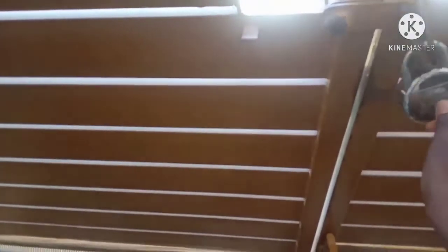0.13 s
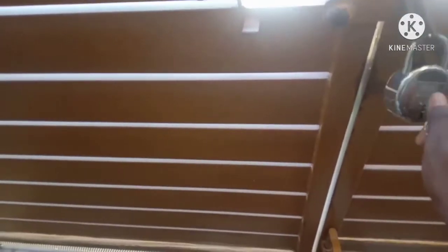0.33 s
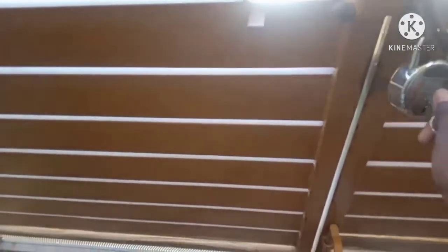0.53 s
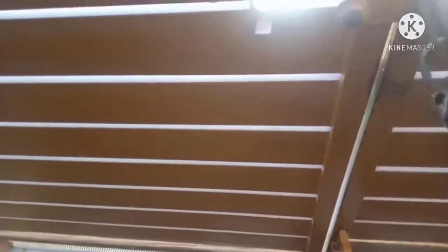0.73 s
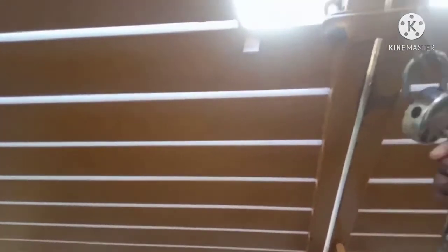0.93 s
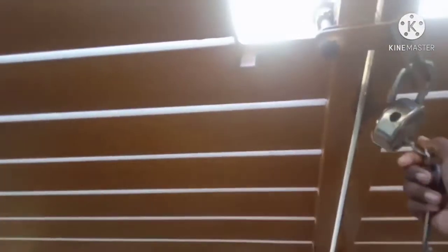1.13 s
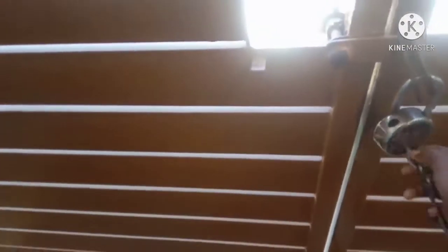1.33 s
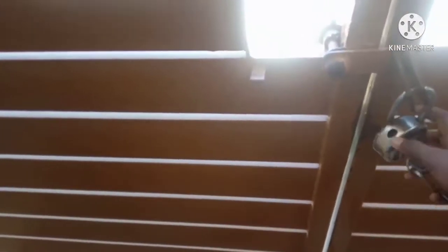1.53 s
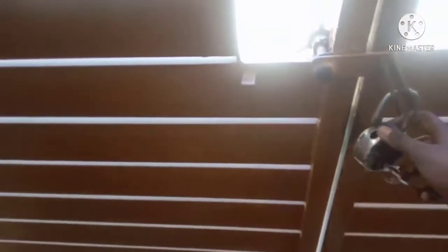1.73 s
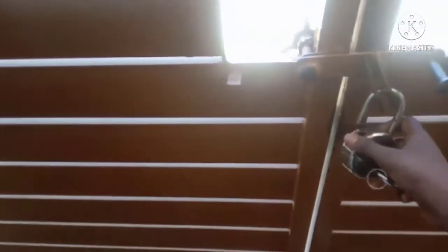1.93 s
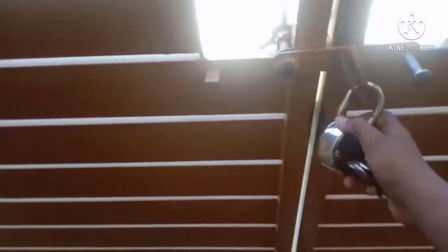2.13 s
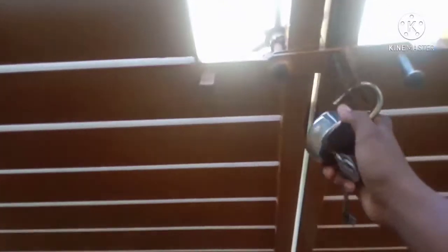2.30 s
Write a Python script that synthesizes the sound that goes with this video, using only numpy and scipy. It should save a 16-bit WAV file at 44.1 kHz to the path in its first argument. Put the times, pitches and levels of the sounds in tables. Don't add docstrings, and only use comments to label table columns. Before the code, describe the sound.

Close phone pickup of a padlock being handled: a bright clink and thud, a loud burst of metallic clatter and dragging, a sharp knock, light ticks, then a last ringing clank while the wooden door hums.

```python
import sys
import numpy as np
from scipy import signal
from scipy.fft import rfft, irfft
from scipy.io import wavfile
from scipy.ndimage import uniform_filter1d, minimum_filter1d

SR = 44100
rng = np.random.default_rng(int(sys.argv[2]) if len(sys.argv) > 2 else 0)


def magnitude_from_level(level_db):
    exponent = np.asarray(level_db, float) / 20
    return 10 ** exponent


def unload_audio(sound):
    columns = np.transpose(np.atleast_2d(sound))
    steps = np.round(np.clip(columns, -1, 1) * 32767)
    wavfile.write(sys.argv[1], SR, steps.astype(np.int16))


N = 104296

# f/Hz, level/dB
AIR_COLOUR = [(30, -19.5), (250, -21), (600, -0.5), (1300, -18.5), (3200, -49), (5500, -7.5), (10500, -14),
              (12500, -33)]
# t/s, level/dB
GRIP_PRESSURE = [(0.0, -45.5), (0.08, -64), (0.51, -54.5), (0.59, -73), (0.74, -41), (0.87, -48),
                 (0.89, -61), (1.07, -51), (1.14, -61), (1.29, -47), (1.32, -55.5), (1.75, -56.5),
                 (1.81, -42.5), (1.85, -68), (1.96, -50), (2.21, -61), (2.27, -60), (2.36, -62)]
# f/Hz, time to fall 60 dB/s
ROOM_DECAY = [(150, 0.82), (500, 0.91), (2000, 0.59), (5000, 0.44), (9000, 0.43), (15000, 0.2)]
# t/s, f/Hz, level/dB, time to fall 60 dB/s
LATE_HUMS = [
    (1.4, 430, -36, .7),
    (1.5, 350, -41, .5),
    (1.85, 605, -36, .7),
    (1.98, 604, -37, .6),
    (2.2, 600, -29, .4),
    (2.25, 520, -29, .8),
    (2.25, 351, -32, .8),
]
# t/s, f/Hz, level/dB, time to fall 60 dB/s
DOOR_HUM = [(0, 520, -24, .4), (.02, 318, -23, .6), (.1, 528, -27, .35), (.36, 358, -25, .45),
            (.365, 655, -29, .25), (.395, 615, -30, .3), (.44, 495, -29, .25), (.47, 358, -23, .25),
            (.59, 356, -29, .5), (.8, 270, -26, .3), (.85, 316, -27, .4), (2.15, 520, -31, .5),
            (2.15, 350, -31, .5), (2.17, 640, -31, .3)]
# f/Hz, width/Hz, level/dB
PANEL_MODES = [(194, 110, -21.5), (334.5, 39, -2.5), (353.5, 15, -0.5), (446, 53, -4.5), (499.3, 13.3, 2),
               (531.6, 55, 1.5), (597, 82, 0), (684, 84, 0.5), (757.5, 25.3, -3), (828, 76, -3.5),
               (1038, 258, 0), (1484, 750, 0.5), (1735, 210, 1), (2400, 890, -8)]
# t/s, level/dB, how far the whole leaf joins in/dB
DOOR_SHAKE = [(0, -32, -1), (.05, -32.5, -6.5), (.3, -49.5, 11), (.36, -29, -2.5), (.5, -34, -4.5),
              (.55, -38.5, -21), (.62, -43.5, 1), (.67, -32.5, 1), (.75, -15, -3.5), (.85, -26, -1.5),
              (1.0, -35.5, 3), (1.28, -49.5, -11.5), (1.39, -35, -18), (1.75, -52, -9.5),
              (1.9, -34.5, -16.5), (2.13, -67, 7.5), (2.15, -28.5, -2.5), (2.36, -37, 4)]
# t/s, level/dB
DOOR_THUDS = [
    (0, -24),
    (.3565, -18),
    (1.311, -20.5),
    (2.14, -25.5),
]
# f/Hz, level/dB, time to fall 60 dB/s
LOCK_PARTS = [(4680, -24, .15), (7060, -26, .1), (7465, -20, .2), (7555, -10, .25), (7750, -22, .1),
              (9770, -24, .12), (10950, -22, .2), (12450, -19, .12), (12690, -17, .3), (14300, -23, .1),
              (15250, -14, .15)]
# f/Hz, level/dB
TICK_COLOUR = [(2000, -14), (5000, -1.5), (7000, 4.5), (10500, 10.5), (13000, -11), (15500, 6)]
# t/s, tick level/dB, ring level/dB, centre of the ringing parts f/Hz, time until damped/s
LOCK_CLINKS = [(0.0537, -2.5, -14, 9200, 0.066), (0.3575, -23.5, -33, 17500, .07),
               (0.6737, -2.5, -14, 8000, .15), (1.129, -13.5, -33, 4700, .05),
               (1.429, -37, -41, 12500, .03), (1.441, -50, -35, 15000, .04), (1.452, -42, -30, 12700, .03),
               (1.458, -40, -29, 7600, 0.01), (1.49, -55, -37, 15200, .07), (1.519, -49, -28, 8800, 0.025),
               (1.552, -36, -34, 9000, .015), (1.572, -55, -42, 15000, .04),
               (1.636, -12, -33, 14800, 0.049), (1.641, -14, -22, 13500, 0.085),
               (1.726, -29, -26, 7940, .02), (1.735, -50, -33, 14900, .045), (1.762, -29, -36, 11800, .025),
               (1.89, -30, -24, 7600, .006), (2.18, -55, -42, 13500, 0.039), (2.31, -55, -54, 12500, 0.033),
               (2.354, -26, -19.5, 9300, .05)]
# t/s, f/Hz, level/dB, time to fall 60 dB/s
HASP_TONES = [(0, 1710, -38, .5), (1.33, 1740, -32, .5), (1.832, 4720, -29, .12), (1.832, 3970, -30, .1),
              (1.845, 3400, -33, .12), (1.881, 3970, -24, .15), (1.885, 5490, -27, .1),
              (2.139, 5600, -23, .25), (2.14, 3190, -26, .45), (2.14, 2820, -28, .4),
              (2.141, 4650, -29, .2), (2.142, 1760, -25, .6), (2.19, 1775, -28, .6)]
# t/s, level/dB
DRAG_LEVEL = [(0, -37.5), (.27, -52), (.32, -40.5), (.36, -39.5), (.55, -58), (.66, -51), (.69, -50),
              (.7, -13.5), (.77, -16), (.82, -26), (.88, -28), (.93, -42), (1.05, -63), (1.2, -50),
              (1.3, -50), (1.9, -38.5), (2.1, -51), (2.36, -37)]
# f/Hz, level/dB, time to fall 60 dB/s
BOLT_MODES = [(1770, -11, .4), (2620, -10, .09), (2850, -9, .1), (3190, -9, .25), (3410, -10, .12),
              (3970, -8, .1), (4320, -13, .08), (4670, -8, .1), (4850, -10, .1), (5125, -9, .08),
              (5400, -8, .09), (5970, -8, .09), (6660, -11, .09), (7100, -13, .1)]
# t/s, level/dB, centre of its colour f/Hz, breadth/octaves, time to fall 60 dB/s
BOLT_KNOCKS = [(0, -32.5, 4150, 0.46, 0.39), (0.3556, -15.5, 3000, 0.94, 0.14),
               (0.366, -17.5, 1830, 0.48, 0.49), (0.674, -0.5, 4000, 5.3, 0.015),
               (0.679, -8, 6500, 2.3, 0.019), (0.6769, -1, 9800, 0.54, 0.073),
               (0.698, -13, 4000, 2.2, 0.09), (0.707, -15, 2180, 0.69, 0.11), (0.715, -6, 5900, .12, 0.037),
               (0.725, -30, 5000, .8, 0.071), (0.74, -4, 3850, 0.2, 0.037), (.747, -2.5, 6000, 0.47, 0.062),
               (0.749, -5, 5010, 0.069, 0.11), (0.777, -24.5, 5330, 0.6, 0.072),
               (.806, -17.5, 1760, 0.39, 0.3), (0.955, -20, 3660, 0.82, 0.12),
               (0.958, -17, 4700, 0.15, 0.072), (1.309, -18, 4100, 1.4, 0.058),
               (1.31, -3.5, 4500, 1.05, 0.05), (1.313, -5, 5300, 0.44, 0.23),
               (1.32, -13.5, 5900, 0.47, 0.12), (1.335, -25, 1450, 1.24, 0.64),
               (1.508, -25.5, 3130, 1, 0.15), (1.832, -30.5, 4270, 0.43, 0.063),
               (1.837, -27, 2660, 1.14, 0.15), (1.844, -38, 3400, 0.4, 0.1),
               (1.881, -17, 3800, 0.53, 0.065), (1.886, -21, 4370, 1.2, 0.044),
               (1.892, -21.5, 4540, 1.2, 0.034), (1.899, -29, 3850, 0.91, 0.13),
               (2.12, -35, 2300, 0.18, 0.063), (2.1391, -8, 5350, 0.11, 0.26),
               (2.1383, -19, 3160, 0.94, 0.37), (2.142, -16, 5500, 0.9, 0.087),
               (2.331, -28.5, 4120, 0.68, 0.12)]

RISE_S, SPREAD_DB = 0.001, 4
BOLT_BLUR_HZ, LOCK_BLUR_HZ = 35, 18
LEAF_HZ = 570


def evened(x):
    return x / np.sqrt(np.mean(x ** 2) + 1e-20)


def read(points, hz):
    f, value = np.transpose(points)
    return np.interp(np.log(hz + 1), np.log(f + 1), value)


def level(points, column=1):
    rows = np.transpose(points)
    return magnitude_from_level(np.interp(np.arange(N) / SR, rows[0], rows[column]))


def add(mix, s, sound):
    part = mix[round(s * SR):][:len(sound)]
    part += sound[:len(part)]


def high_pass(x, hz, order=2):
    return signal.sosfilt(signal.butter(order, hz, "high", fs=SR, output="sos"), x)


def bump_db(hz, centre_hz, octaves):
    distance = np.log2((hz + 1) / centre_hz) / octaves
    return np.maximum(-6 * distance ** 2, -45)


def coloured(db_of, size):
    spectrum = rfft(rng.standard_normal(size))
    return evened(irfft(spectrum * magnitude_from_level(db_of(np.fft.rfftfreq(size, 1 / SR))), size))


def burst(db_of, t60, size=4096):
    t = np.arange(size) / SR
    return coloured(db_of, size) * np.minimum(2 * t / RISE_S, 1) * magnitude_from_level(-60 * t / t60)


def clicks(per_s, spread_db):
    size = magnitude_from_level(spread_db * np.minimum(rng.exponential(1, N), 4)) * rng.choice([-1., 1.], N)
    return evened(size * (rng.random(N) < per_s / SR))


def ring(modes, extra_db, blur_hz, longest_s, size=8192):
    hz, db, t60 = np.transpose(modes)[:, :, None]
    t = np.arange(size) / SR
    chance = rng.standard_normal((len(hz), 4))
    waves = sum(np.sin(2 * np.pi * (hz + blur_hz * chance[:, k:k + 1]) * t) for k in range(3))
    start_db = db + extra_db(hz) + SPREAD_DB * chance[:, 3:]
    fading = magnitude_from_level(start_db - 60 * t / np.minimum(t60, longest_s))
    return (fading * waves).sum(0) * np.minimum(t / RISE_S, 1)


def singles(rows, blur_hz, rise_s):
    out, t = np.zeros(N), np.arange(16384) / SR
    for s, hz, db, t60 in rows:
        off = blur_hz * rng.standard_normal((2, 1))
        neighbours = np.sin(2 * np.pi * (hz + off) * t).sum(0)
        trio = np.sin(2 * np.pi * hz * t) + 0.45 * neighbours
        add(out, s, magnitude_from_level(db - 60 * t / t60) * trio * np.minimum(t / rise_s, 1))
    return out


def air():
    return magnitude_from_level(-44.5) * coloured(lambda f: read(AIR_COLOUR, f), N)


def grip():
    lumps = coloured(lambda f: -20 * np.log10(1 + (f / 12) ** 2), N)
    rumble = coloured(lambda f: bump_db(f, centre_hz=95, octaves=0.6), N)
    return level(GRIP_PRESSURE) * magnitude_from_level(3 * lumps - 2) * rumble


def room(x):
    taps = np.zeros(SR)
    at = np.arange(200, SR - 20, 20)
    taps[at + rng.integers(0, 20, len(at))] = rng.choice([-1., 1.], len(at))
    hz, t, z = signal.stft(taps, SR, nperseg=256)
    fading = magnitude_from_level(-60 * t / read(ROOM_DECAY, hz)[:, None])
    tail = signal.istft(z * fading, SR, nperseg=256)[1]
    return signal.fftconvolve(x, tail / np.linalg.norm(tail))[:N]


def sway():
    return singles(LATE_HUMS, blur_hz=8.1, rise_s=0.029)


def hum():
    return singles(DOOR_HUM, blur_hz=11.8, rise_s=0.012)


def door():
    t = np.arange(8192) / SR
    modes = []
    for k, (hz, width, db) in enumerate(PANEL_MODES):
        fading = magnitude_from_level(db) * np.sqrt(width) * np.exp(-np.pi * width * t)
        modes.append(fading * np.sin(2 * np.pi * hz * t) * (-1) ** k)
    modes = np.array(modes)
    modes = modes / np.linalg.norm(modes.sum(0))
    low = np.array(PANEL_MODES)[:, 0] < LEAF_HZ

    hiss_share = 0.75
    rattle = np.sqrt(1 - hiss_share ** 2) * clicks(per_s=500, spread_db=1.0)
    drive = level(DOOR_SHAKE) * (hiss_share * rng.standard_normal(N) + rattle)
    for s, db in DOOR_THUDS:
        add(drive, s, magnitude_from_level(db + 10.5) * burst(np.zeros_like, 0.026))

    leaf = signal.oaconvolve(drive * level(DOOR_SHAKE, column=2), modes[low].sum(0))
    panel = signal.oaconvolve(drive, high_pass(modes[~low].sum(0), 0.55 * LEAF_HZ))
    return (leaf + panel)[:N]


def lock():
    out, t = np.zeros(N), np.arange(8192) / SR
    for s, tick_db, ring_db, hz, free_s in LOCK_CLINKS:
        add(out, s, magnitude_from_level(tick_db) * burst(lambda f: read(TICK_COLOUR, f), t60=0.02))
        parts = ring(LOCK_PARTS, lambda f: bump_db(f, hz, octaves=0.38), LOCK_BLUR_HZ, longest_s=1)
        damping_db = 1100 * np.maximum(t - free_s, 0)
        add(out, s, magnitude_from_level(ring_db - damping_db) * parts)
    return out


def hasp():
    return singles(HASP_TONES, blur_hz=40, rise_s=0.003)


def drag():
    colour = lambda f: bump_db(f, centre_hz=4540, octaves=1.33)
    scrape = np.zeros(N)
    for _ in range(5):
        catch = burst(colour, 0.013, size=2048)
        catch = catch + magnitude_from_level(-3.5) * ring(BOLT_MODES, colour, BOLT_BLUR_HZ, 0.021, size=2048)
        scrape += signal.oaconvolve(clicks(per_s=0.27 * 560, spread_db=1.0), catch)[:N]
    return level(DRAG_LEVEL) * evened(scrape)


def bolt():
    out = np.zeros(N)
    for s, db, hz, octaves, t60 in BOLT_KNOCKS:
        colour = lambda f: bump_db(f, hz, octaves)
        add(out, s, magnitude_from_level(db) * burst(colour, 0.6 * t60, size=8192))
        add(out, s, magnitude_from_level(db - 7) * ring(BOLT_MODES, colour, BOLT_BLUR_HZ, t60))
    return out


def scene():
    steel = high_pass(bolt() + drag() + hasp(), 700)
    wood, small = door(), lock()
    echoes = room(magnitude_from_level(-7.5) * steel + magnitude_from_level(-18) * small + wood)
    near = high_pass(hum() + steel + small + wood + echoes, 160, order=3)
    return (near + grip() + air() + sway())[None]


def roll_off(x):
    return signal.sosfilt(signal.butter(12, 16430, fs=SR, output="sos"), x)


def record(dry):
    knee_db, squeeze, ahead_s, recover_db_per_s = -9.5, 0.9, 0.0085, 89
    power_db = 10 * np.log10(abs(uniform_filter1d(dry[0] ** 2, 200)) + 1e-12)
    ahead = -minimum_filter1d(-power_db, 2 * round(ahead_s * SR) + 1)
    fall = np.arange(N) * recover_db_per_s / SR
    held_db = np.maximum.accumulate(ahead + fall) - fall
    over_db = np.maximum(held_db - knee_db, 0)
    ducked = dry / magnitude_from_level(squeeze * uniform_filter1d(over_db, 150))
    treble_limit = signal.firwin(255, 15550, window=("kaiser", 9), fs=SR)
    cut = signal.oaconvolve(ducked, treble_limit[None], "same")
    return roll_off(np.clip(cut, -1, 1))


dry = scene()
out = record(dry)
unload_audio(out)
```